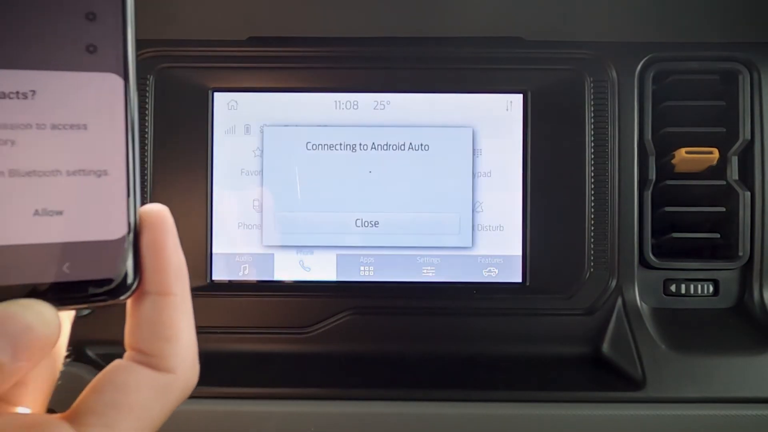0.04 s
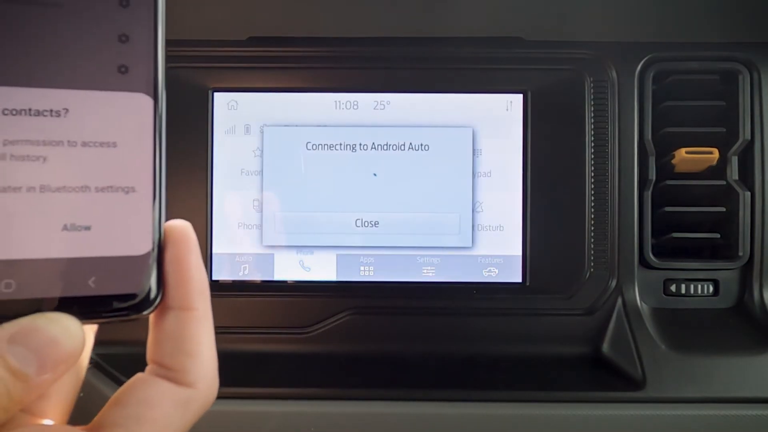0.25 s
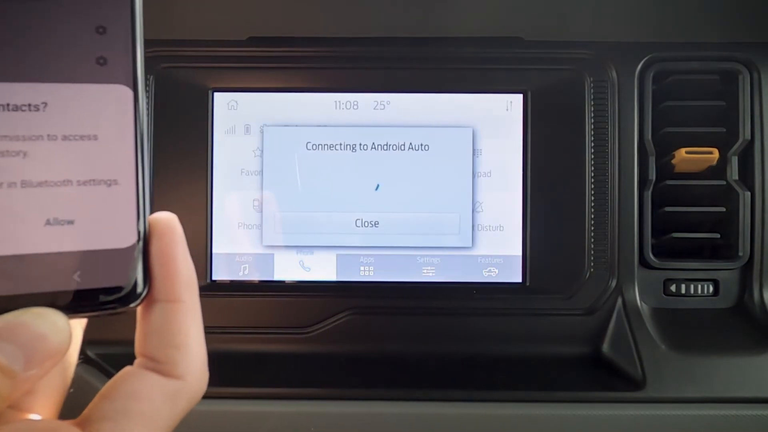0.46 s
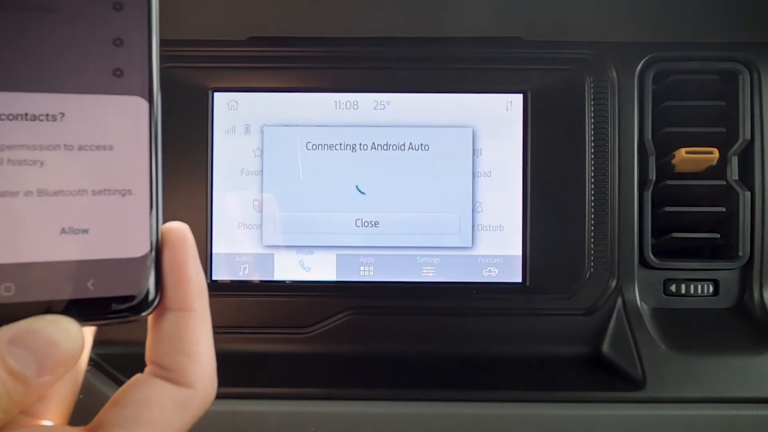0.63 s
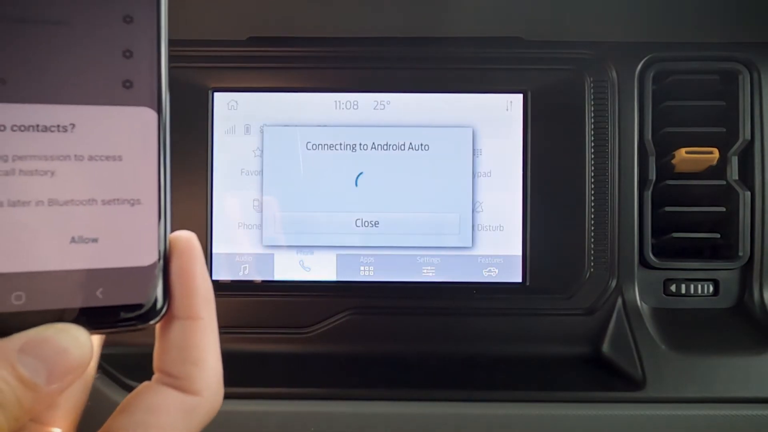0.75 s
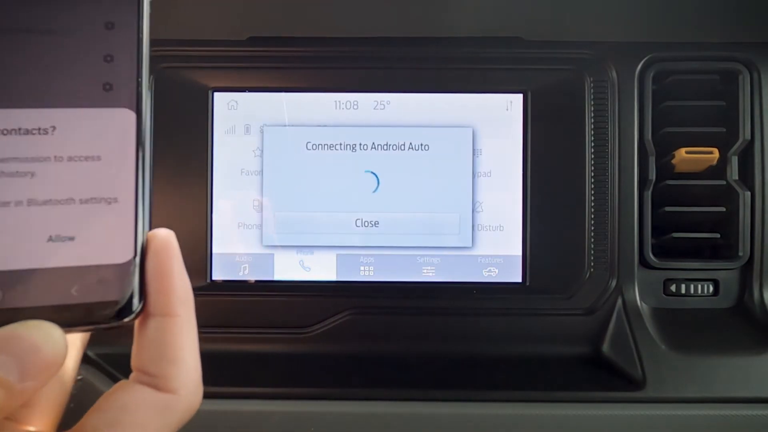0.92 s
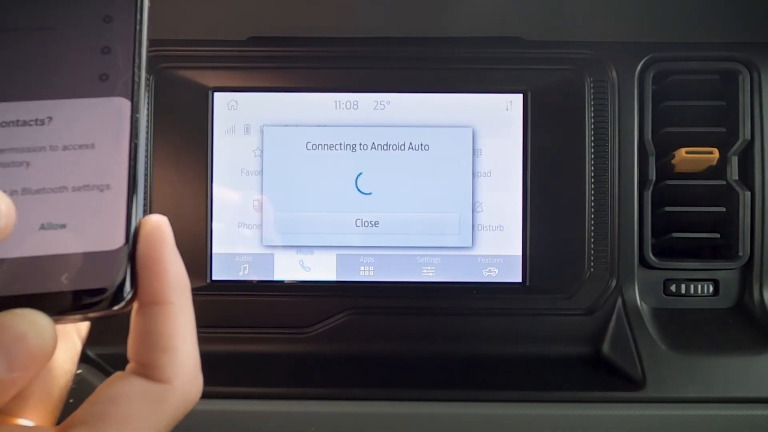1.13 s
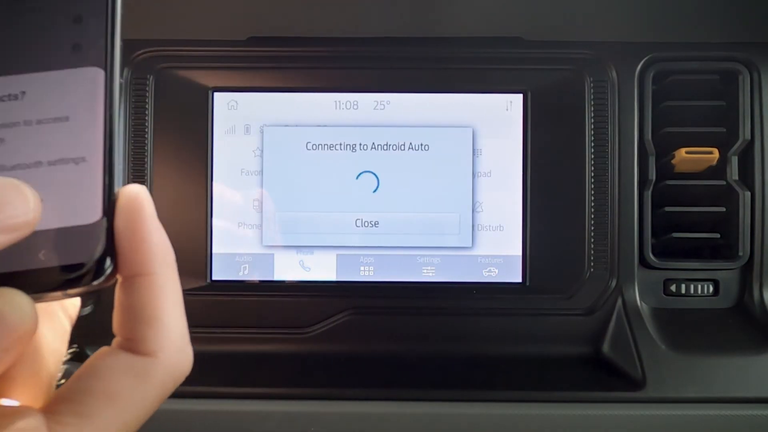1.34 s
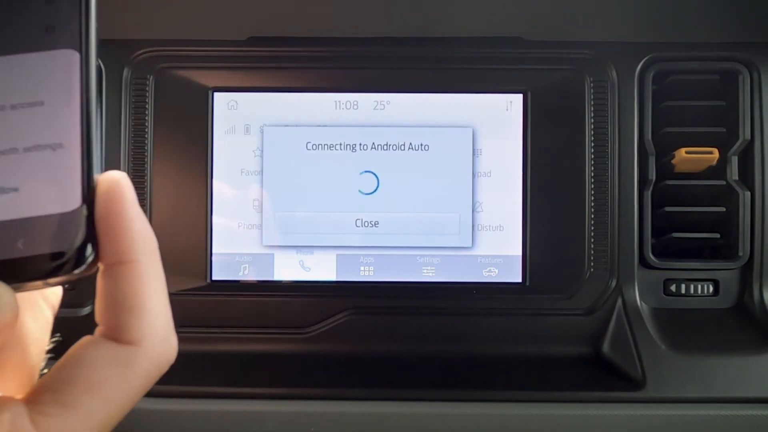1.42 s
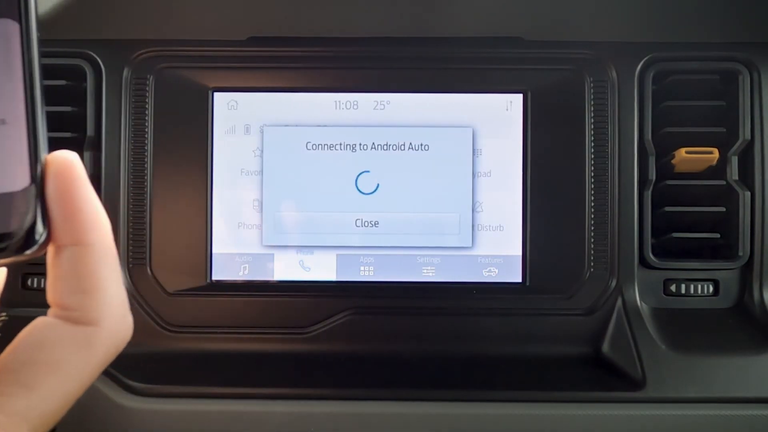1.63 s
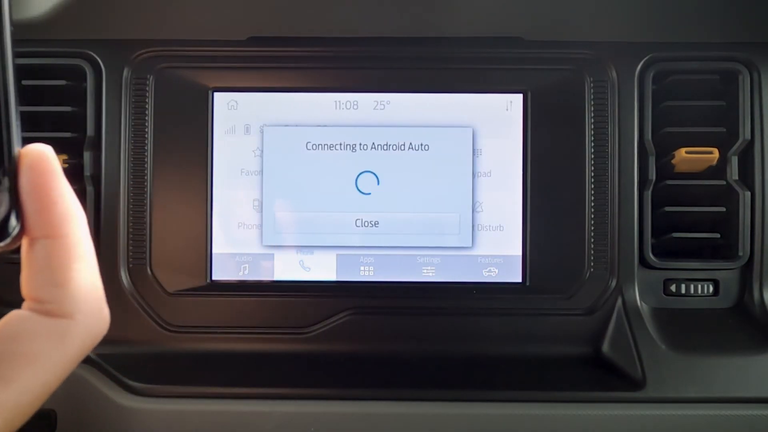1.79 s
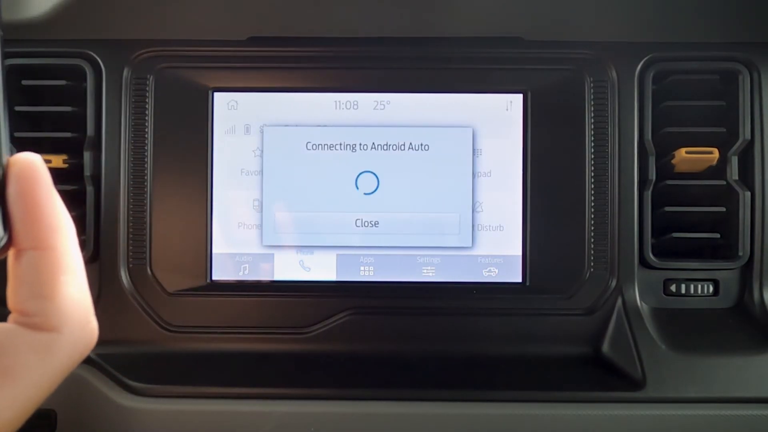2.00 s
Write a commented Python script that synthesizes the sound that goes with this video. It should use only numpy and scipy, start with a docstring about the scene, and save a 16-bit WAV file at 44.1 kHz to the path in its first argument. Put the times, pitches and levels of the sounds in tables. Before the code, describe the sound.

A car engine idles with a steady low throb and faint whine, heard from inside the parked cabin. Close by, the plastic trim is knocked lightly once, then a sleeve rustles softly and a fingertip taps a phone.

```python
"""Idling car, from inside.

A four-cylinder engine idles at about 870 rpm. Its firings make the cabin throb and the dashboard
drone, combustion rumbles through the bulkhead and the valve gear patters on the panels.
Accessories whine and a pulley twitters faintly over the cabin air. Close by, the trim is knocked
once and a sleeve slides softly as a hand taps and moves a phone."""
import sys
import numpy as np
from scipy import signal
from scipy.fft import rfft, irfft, next_fast_len
from scipy.io import wavfile

SR = 44100
rng = np.random.default_rng(int(sys.argv[2]) if len(sys.argv) > 2 else 0)


def pcm_store(signal):
    """Save signal as 16-bit PCM."""
    levels = np.round(np.clip(np.atleast_2d(signal), -1, 1) * 32767)
    wavfile.write(sys.argv[1], SR, levels.astype(np.int16).T)


N = 90581
TIME_S = np.arange(N) / SR


def from_db(db):
    """Decibels to gain."""
    return 10 ** (np.asarray(db) / 20)


def unit_rms(x):
    """Scale to RMS 1."""
    return x / np.sqrt(np.mean(x ** 2) + 1e-20)


def curve(rows):
    """Time-value rows interpolated at every sample."""
    return np.interp(TIME_S, *np.transpose(rows))


def drift(rate_hz):
    """Slow random motion, RMS about 1."""
    hop, settle = 20, 4000
    pole = np.exp(-2 * np.pi * rate_hz * hop / SR)
    noise = rng.standard_normal(N // hop + settle + 2)
    slow = signal.lfilter([1], [1, -2 * pole, pole * pole], noise)[settle:]
    return np.interp(np.arange(N) / hop, np.arange(len(slow)), unit_rms(slow))


def colour(x, spectrum):
    """Filter by a smooth spectrum; RMS 1."""
    hz, db = np.transpose(spectrum)
    size = next_fast_len(N)
    bins_hz = np.maximum(np.fft.rfftfreq(size, 1 / SR), 1)
    gain = from_db(np.interp(np.log(bins_hz), np.log(hz), db)) * (bins_hz > 10)
    return unit_rms(irfft(rfft(x, size) * gain, size)[:N])


def resonate(x, hz, width_hz):
    """One resonance applied twice for steep skirts; RMS 1."""
    b, a = signal.iirpeak(hz, hz / width_hz / np.sqrt(2), fs=SR)
    return unit_rms(signal.lfilter(b, a, signal.lfilter(b, a, x)))


def contact(start_s, hz, width_hz, db, decay_s):
    """A rough ring: a decaying band of noise."""
    envelope = (TIME_S >= start_s) * np.exp(-np.abs(TIME_S - start_s) / decay_s)
    ring = resonate(rng.standard_normal(N + SR), hz, width_hz)[SR:]
    return from_db(db) * envelope * ring


def crank_tones(firings, orders, waver, waver_hz):
    """Tones locked to the crankshaft, wavering in level and phase."""
    out = 0
    for multiple, db in orders:
        phase = 2 * np.pi * multiple * firings
        in_phase = (1 + waver * drift(waver_hz)) * np.sin(phase)
        quadrature = waver * drift(waver_hz) * np.cos(phase)
        out += from_db(db) * unit_rms(in_phase + quadrature)
    return out


# Cabin air: (frequency [Hz], relative density [dB])
AIR_SPECTRUM = [(500, 6), (3000, -4.5), (6000, -5.5), (9000, -8), (15500, -7)]


def cabin_air(level_db=-64):
    """Steady faint hiss of air."""
    return from_db(level_db) * colour(rng.standard_normal(N), AIR_SPECTRUM)


# Pulley twitter: (time [s], level [dB])
CHIRP_LEVEL = [(0, -81), (.12, -77.5), (.4, -76), (.5, -79.5), (.85, -80), (1.1, -85), (2.05, -85)]


def pulley(firings):
    """One short falling chirp per firing, every second one weaker, no two alike."""
    centre_hz, jitter_hz, fall_hz_per_s = 5710, 44.2, 5000
    anchor_s, sigma_s, offbeat_db, spread_db = 0.0616, .0065, 4.5, 1.6
    count = firings - np.interp(anchor_s, TIME_S, firings)
    index = np.round(count).astype(int)
    level_scatter, pitch_scatter = rng.standard_normal((N, 2))[index].T
    offset_s = (count - index) / curve(FIRING_RATE)
    strength = from_db(spread_db * level_scatter - offbeat_db * (index % 2))
    envelope = strength * np.exp(-.5 * (offset_s / sigma_s) ** 2)
    hz = centre_hz - fall_hz_per_s * offset_s + jitter_hz * (drift(300) + .5 * pitch_scatter)
    tone = np.sin(2 * np.pi * np.cumsum(hz) / SR)
    return from_db(curve(CHIRP_LEVEL)) * unit_rms(envelope * tone)


# Cloth friction hiss: (frequency [Hz], relative density [dB])
HISS_SPECTRUM = [(2000, -14), (4000, -28), (6000, -11.5), (7200, -6), (8500, -8.5), (10000, -2),
                 (10600, -1.5), (11200, 1), (12000, 2.5), (13300, 1.5), (14300, 0), (15500, .5)]
# Dull cloth rub: (frequency [Hz], relative density [dB])
RUB_SPECTRUM = [(800, -9), (2200, -10), (3200, -5), (4000, -3), (5500, -10), (9000, -11.5)]
# Sleeve strokes: (start [s], attack [s], hold [s], release per 20 dB [s], hiss [dB], rub [dB],
# hiss tilt [dB/octave], hiss focus [Hz])
SLEEVE_STROKES = [(0.445, .04, 0.61, .1, -70.5, -71, -4, 13000),
                  (0.574, 0.018, .012, 0.032, -61.5, -64, -3, 13500),
                  (0.672, .025, 0.028, 0.018, -52.5, -80, 6, 15000),
                  (0.774, 0.011, .005, 0.026, -64, -76, -8, 12000),
                  (1.02, 0.021, 0.06, 0.13, -55.5, -69, -1.5, 11800),
                  (1.11, .03, .03, .05, -63, -80, 1, 11700), (1.426, 0.04, .025, 0.1, -63, -73, 2, 12200),
                  (1.608, 0.033, 0.025, 0.098, -53, -66.5, 5, 14000),
                  (1.681, .025, 0.046, 0.042, -59.5, -66.5, 1, 14000),
                  (1.757, 0.022, 0.031, 0.084, -49, -63, 0, 14200),
                  (1.81, 0.025, 0.15, 0.075, -68.5, -65, 1, 13500),
                  (1.954, 0.035, 0.046, 0.082, -65, -65, 6, 14000)]


def sleeve(focus_db=3.5, focus_sigma_hz=860, grain_db=-0.5):
    """Sliding cloth: a grainy hiss of fibres over a duller rub."""
    out = 0
    grain = from_db(grain_db * drift(140))
    hz, cloth_db = np.transpose(HISS_SPECTRUM)
    for start_s, attack_s, hold_s, release_s, hiss_db, rub_db, tilt_db, focus_hz in SLEEVE_STROKES:
        age_s = TIME_S - start_s
        rise = np.clip(age_s / attack_s, 0, 1)
        fall = from_db(-20 * np.maximum(age_s - attack_s - hold_s, 0) / release_s)
        bump_db = focus_db * np.exp(-.5 * ((hz - focus_hz) / focus_sigma_hz) ** 2)
        spectrum = np.transpose([hz, cloth_db + tilt_db * np.log2(hz) + bump_db])
        hiss = from_db(hiss_db) * colour(grain * rng.standard_normal(N), spectrum)
        rub = from_db(rub_db) * colour(rng.standard_normal(N), RUB_SPECTRUM)
        out += rise * fall * (hiss + rub)
    return out


def grip_tick():
    """A tiny tick of the hand's grip."""
    return contact(start_s=1.9075, hz=12800, width_hz=5000, db=-52, decay_s=.002)


# Phone modes: (frequency [Hz], level [dB], decay [s])
PHONE_MODES = [(1280, -48, .004), (1760, -49.5, .0035), (2750, -63, .008)]


def phone_tap(start_s=1.335):
    """A fingertip sets the phone ringing briefly."""
    age_s = np.maximum(TIME_S - start_s, 0)
    return sum(from_db(db) * np.exp(-age_s / decay_s) * np.sin(2 * np.pi * hz * age_s)
               for hz, db, decay_s in PHONE_MODES)


# Plastic trim modes: (frequency [Hz], width [Hz], level [dB], decay [s])
TRIM_MODES = [(257, 75, -27.5, 0.007), (742, 180, -32, 0.003), (904, 52, -42.5, 0.02),
              (1346, 210, -40.5, 0.012), (2520, 1000, -91, 0.011), (7000, 1100, -53.5, 0.012),
              (9100, 11000, -38, 0.0011)]


def trim_knock(start_s=0.0014):
    """A light knock rings the trim."""
    return sum(contact(start_s, *mode) for mode in TRIM_MODES)


# Accessory tones: (frequency [Hz], level [dB])
WHINE_TONES = [(367.6, -51.5), (407.3, -56)]
# Whine swell: (time [s], gain [dB])
WHINE_GAIN = [(0, 2), (.18, -0.5), (.35, -7.5), (.68, -5), (.97, 2), (1.22, -4.5), (1.43, 2.5), (1.62, -2),
              (1.83, 0), (2.05, -4)]


def accessory_whine(waver_hz=1, flutter_db=1.5):
    """Engine accessories: near-steady pitches that swell and fade."""
    out = 0
    for hz, db in WHINE_TONES:
        phase = 2 * np.pi * np.cumsum(hz + waver_hz * drift(9.5)) / SR
        out += from_db(db + flutter_db * drift(5.2)) * unit_rms(np.sin(phase))
    return from_db(curve(WHINE_GAIN)) * out


# Dashboard tones: (multiple of firing rate [1], level [dB])
DRONE_ORDERS = [(9.5, -61.5), (11.5, -62), (12, -56.5), (13, -59), (15, -56), (16, -70.5), (19.5, -66.5)]


def dashboard_drone(firings):
    """High engine orders vibrate the dashboard."""
    return crank_tones(firings, DRONE_ORDERS, waver=.3, waver_hz=2.66)


# Panel resonances: (frequency [Hz], width [Hz], level [dB])
PANEL_MODES = [(356, 54, -53.5), (420, 46, -55), (544, 61, -64.5), (748.4, 55, -64.5), (1058, 106, -63.5),
               (1361, 81, -72), (1770, 100, -76.5), (2395, 60, -79.5), (2757, 39, -81.5),
               (3370, 390, -79.5), (4170, 440, -88), (5130, 88, -85)]


def valve_gear(firings, decay_s=0.0095, spread_db=2.5, steady_force=0.28):
    """Two uneven knocks per firing, over steady noise, ring the panels."""
    knocks = 2 * firings
    age_s = (knocks % 1) / (2 * curve(FIRING_RATE))
    strength = from_db(spread_db * rng.uniform(-0.71, 1, N))[knocks.astype(int)]
    force = steady_force + strength * np.exp(-age_s / decay_s)
    return sum(from_db(db) * resonate(force * rng.standard_normal(N), hz, width_hz)
               for hz, width_hz, db in PANEL_MODES)


# Engine noise through the bulkhead: (frequency [Hz], relative density [dB])
RUMBLE_SPECTRUM = [(20, 3), (45, 8.5), (66, -5), (80, -1.5), (105, -10), (138, -5), (158, -9.5),
                   (210, -16.5), (280, -12), (480, -18.5), (620, -22), (1150, -23.5), (1600, -36),
                   (2300, -39.5), (4000, -46), (8000, -58.5)]


def combustion_rumble(firings, level_db=-40, throb_depth=0.04, repeat_share=0.27):
    """Combustion noise, swelling at each firing and partly repeating every four."""
    cycle_sample = (firings % 4 * N / firings[-1]).astype(int)
    repeating = np.sqrt(repeat_share) * rng.standard_normal(N)[cycle_sample]
    fresh = np.sqrt(1 - repeat_share) * rng.standard_normal(N)
    throb = 1 + throb_depth * np.cos(2 * np.pi * firings)
    return from_db(level_db) * colour((repeating + fresh) * throb, RUMBLE_SPECTRUM)


# Cabin boom tones: (multiple of firing rate [1], level [dB])
BOOM_ORDERS = [(.5, -39.5), (1, -24.2), (1.5, -50), (2, -38.6), (2.5, -60), (3, -63), (4, -46.5),
               (4.5, -63), (6, -65), (6.5, -68), (8, -67)]
# Boom swell as the idle labours and eases: (time [s], gain [dB])
BOOM_GAIN = [(0, 0), (.13, -1.3), (.33, .7), (.52, -.8), (.8, 1.2), (1.1, -.6), (1.65, 1), (1.97, -1.8)]


def cabin_boom(firings, spread=.06):
    """Firings of uneven strength make the cabin throb."""
    per_firing = 1 + spread * rng.standard_normal(N)
    strength = np.interp(firings, np.arange(N), per_firing)
    tones = crank_tones(firings, BOOM_ORDERS, waver=.04, waver_hz=3.3)
    return from_db(curve(BOOM_GAIN)) * strength * tones


# Idle speed: (time [s], firing rate [Hz])
FIRING_RATE = [(0, 29.21), (.3, 28.94), (.6, 28.96), (.85, 28.84), (1.05, 29.05), (1.75, 28.94),
               (2.05, 29.13)]


def firing_count(first_s=0.01, speed_waver=0.0028):
    """Crankshaft position, counted in firings, at a slightly unsteady idle."""
    rate_hz = curve(FIRING_RATE) * (1 + speed_waver * drift(6))
    firings = np.cumsum(rate_hz) / SR
    return firings + 1 - np.interp(first_s, TIME_S, firings)


def scene():
    """Engine, cabin air and hand, in mono."""
    firings = firing_count()
    tones = cabin_boom(firings) + dashboard_drone(firings) + accessory_whine()
    engine = tones + combustion_rumble(firings) + valve_gear(firings) + pulley(firings)
    return (engine + cabin_air() + sleeve() + trim_knock() + phone_tap() + grip_tick())[None]


def record(dry):
    """Steep low-pass on the top treble."""
    cutoff_hz = 15750
    return signal.sosfilt(signal.ellip(12, .1, 80, cutoff_hz, fs=SR, output="sos"), dry)


dry = scene()
out = record(dry)
pcm_store(out)
```